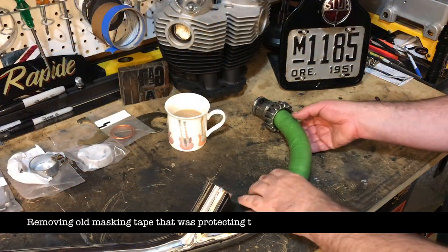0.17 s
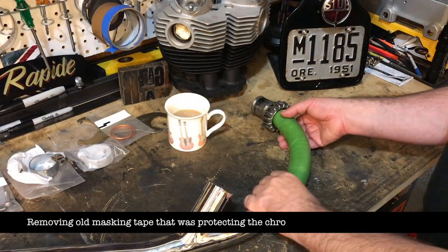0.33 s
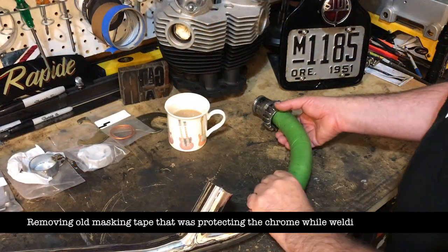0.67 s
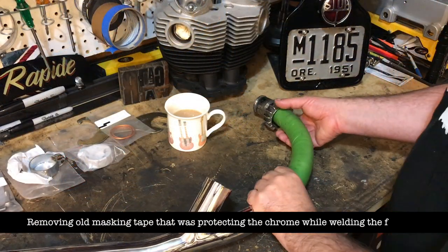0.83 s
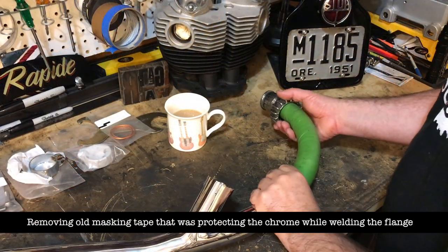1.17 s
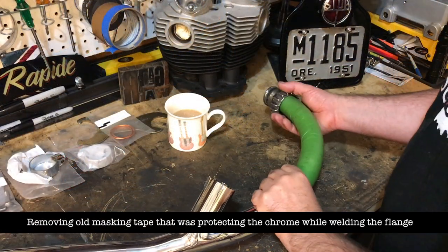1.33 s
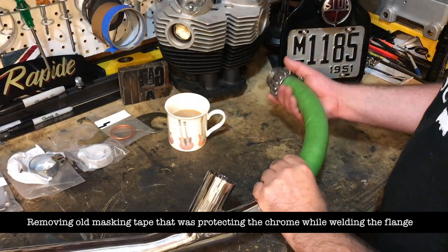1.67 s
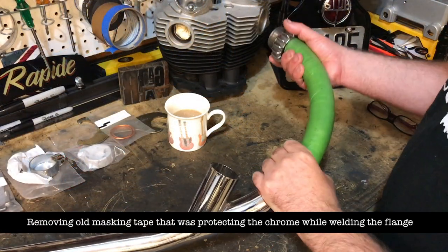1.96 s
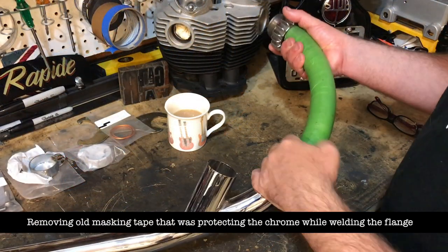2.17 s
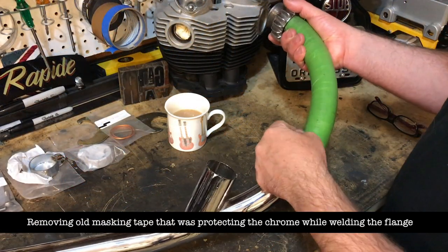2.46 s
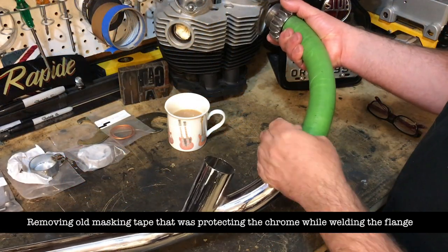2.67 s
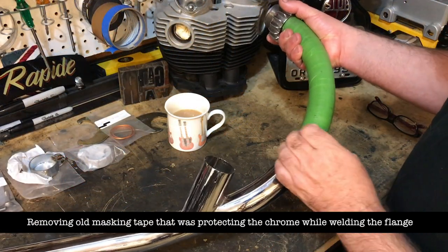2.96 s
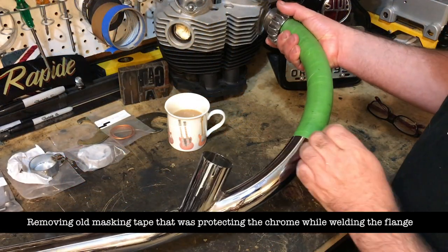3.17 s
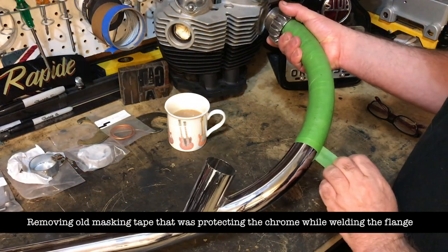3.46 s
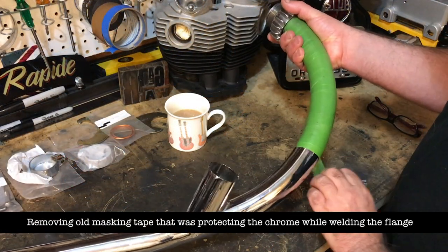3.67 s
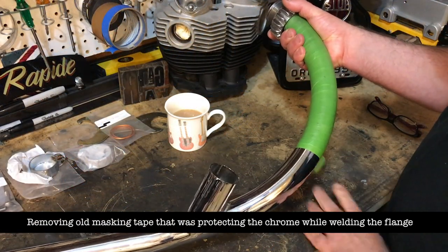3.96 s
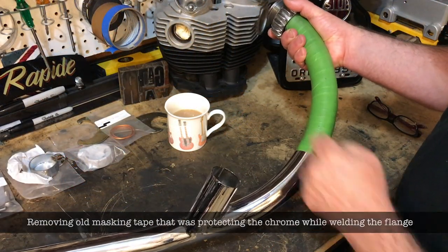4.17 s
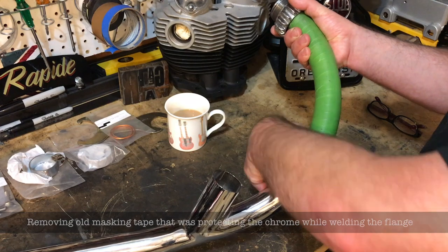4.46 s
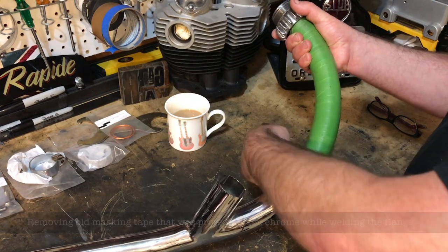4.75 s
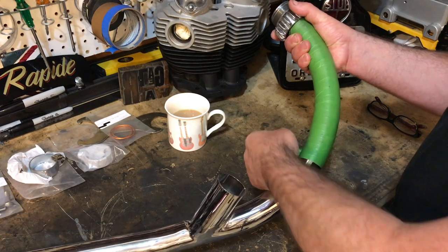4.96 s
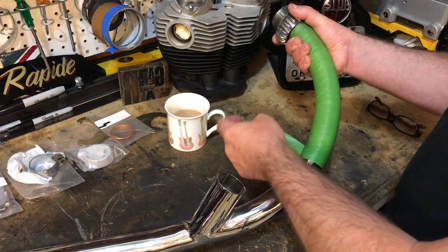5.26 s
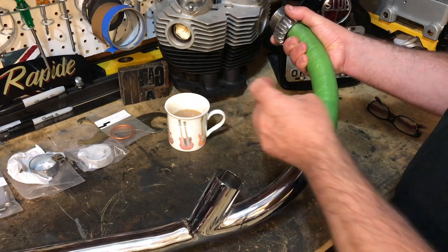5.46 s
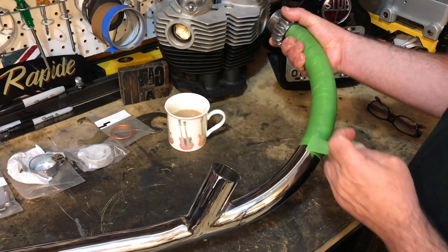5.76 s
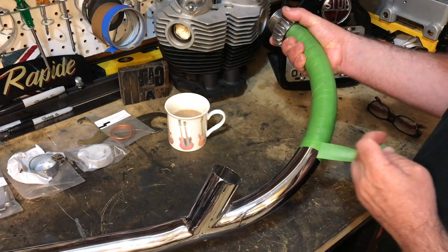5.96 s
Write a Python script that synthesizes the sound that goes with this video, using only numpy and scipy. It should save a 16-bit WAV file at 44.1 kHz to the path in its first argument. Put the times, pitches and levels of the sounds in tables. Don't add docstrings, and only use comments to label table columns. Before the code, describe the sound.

Very close in a quiet workshop, hands softly brush a taped steel pipe. A solid woody knock with small bounces comes early, followed by a short jangling scrape of a loose metal collar as the pipe is lifted. After fingertip rustles, masking tape peels in several crackling pulls, its tearing tone sinking as the strip lengthens, with sharp snaps. A faint low machine hum continues beneath.

```python
import sys
import numpy as np
from scipy import signal
from scipy.fft import rfft, irfft, next_fast_len
from scipy.io import wavfile
from scipy.ndimage import uniform_filter1d

SR = 44100
rng = np.random.default_rng(int(sys.argv[2]) if len(sys.argv) > 2 else 0)


def output_pcm(signal):
    pcm = np.clip(np.atleast_2d(signal).T, -1, 1) * 32767
    wavfile.write(sys.argv[1], SR, np.round(pcm).astype(np.int16))


def ratio(d):
    e = np.asarray(d, float) / 20
    return 10 ** e


N = 269892


def evened(x):
    return x / np.sqrt(np.mean(x ** 2) + 1e-30)


def smoothed(x, size, axis=-1):
    return uniform_filter1d(uniform_filter1d(x, size=size, axis=axis), size=size, axis=axis)


def read(points, hz):
    f, value = np.transpose(points)
    return np.interp(np.log(hz + 1), np.log(f + 1), value)


def curve(rows, column, rest_db=-120):
    t = np.arange(N) / SR
    rows = np.array(rows)
    return np.interp(t, rows[:, 0], rows[:, column], left=rest_db, right=rest_db)


def swells(rows, extra_db=0):
    t = np.arange(0, N, 64)[:, None] / SR
    peak, rise, fall, db = np.transpose(rows)[:4]
    away = np.where(t < peak, (peak - t) / rise, (t - peak) / fall)
    shape_db = -29 * away ** 1.325
    power = ratio(2 * (db + extra_db + shape_db)).sum(axis=1)
    return np.interp(np.arange(N) / SR, t[:, 0], np.sqrt(power))


def coloured(x, points):
    size = next_fast_len(len(x))
    gain = ratio(read(points, np.fft.rfftfreq(size, 1 / SR)))
    return evened(irfft(rfft(x, size) * gain, size)[:len(x)])


def resonate(x, hz, width):
    turn = np.exp(2j * np.pi * np.cumsum(hz * np.ones(len(x))) / SR)
    r = np.exp(-np.pi * width / SR)
    return 2 * (turn * signal.lfilter([1 - r], [1, -r], x / turn)).real


def ring(modes):
    t = np.arange(SR // 2) / SR
    out = sum(ratio(db - 60 * t / t60) * np.sin(2 * np.pi * hz * t) for hz, db, t60 in modes)
    return out / abs(out).max()


def blows(times, dbs):
    out = np.zeros(N)
    out[np.round(np.asarray(times) * SR).astype(int)] = ratio(dbs)
    return out


def crackle(per_s, spread_db, clump_db):
    size = ratio(spread_db * np.minimum(rng.exponential(1, N), 5)) * rng.standard_normal(N)
    clumps = evened(smoothed(rng.standard_normal(N), 150))
    return size * (rng.random(N) < per_s / SR) * ratio(clump_db * clumps)


def patchy(x, narrow_db, wide_db):
    z = signal.stft(x, nperseg=512, noverlap=384)[2]
    a, b = rng.standard_normal((2, z.shape[1], z.shape[0]))
    narrow = evened(uniform_filter1d(uniform_filter1d(a, size=22, axis=0), size=2, axis=1))
    wide = evened(uniform_filter1d(uniform_filter1d(b, size=9, axis=0), size=16, axis=1))
    gain = ratio(narrow_db * narrow + wide_db * wide).T
    return evened(signal.istft(z * gain, nperseg=512, noverlap=384)[1][:N])


def gliding_modes(rows, spread):
    out = np.zeros(N)
    shakes = rng.standard_normal((len(rows), SR // 2))
    for (start, length, db, first_hz, last_hz), shake in zip(rows, shakes):
        u = np.arange(0, min(length, .5) - 1 / SR, 1 / SR) / length
        hz = first_hz * (last_hz / first_hz) ** u
        width = spread * hz.mean()
        drum = evened(resonate(resonate(shake[:len(u)], hz, width), hz, 2 * width))
        flutter_db = 1.5 * evened(smoothed(shake[::-1], 500))[:len(u)]
        arch_db = -5 * (2 * u ** .8 - 1) ** 2
        sound = drum * ratio(db + arch_db + flutter_db) * signal.windows.tukey(len(u), .4)
        part = out[round(start * SR):][:len(u)]
        part += sound[:len(part)]
    return out


def background():
    # hz, level_db per Hz
    room = [(26, -22.5), (60, -2), (240, -13.5), (500, -21), (1300, -24), (5000, -30), (10000, -28.5),
            (14500, -35), (15750, -31.5), (15900, -87)]
    # time_s, level_db
    effort = [(0.0, -54.5), (1.07, -56), (1.14, -62.5), (1.62, -52.5), (1.91, -77), (1.98, -62),
              (2.34, -58.5), (2.59, -54), (3.82, -55.5), (3.9, -66), (4.23, -48), (4.38, -54), (5.49, -57),
              (5.56, -60), (5.67, -54), (6.12, -61)]
    # peak_s, rise_s, fall_s, level_db
    shifts = [
        (.7, 0.078, 0.32, -62),
        (1.15, 0.19, 0.09, -68),
        (1.42, .3, .15, -74),
        (1.8, 0.14, 0.67, -62.5),
        (2.48, 0.54, 0.09, -78),
        (3.2, 0.75, 0.61, -73.5),
        (4.43, 0.44, 0.35, -79),
        (4.79, 0.085, 0.099, -61.5),
        (5.7, 0.63, 0.4, -75.5),
    ]
    a, b, c, d, e = rng.standard_normal((5, N))
    hiss = coloured(a, room)
    high_pass = signal.butter(4, 160, "high", fs=SR, output="sos")
    hiss *= ratio(-75) / np.std(signal.sosfilt(high_pass, hiss))
    whine = ratio(-91) * evened(resonate(b, 720, 5))
    waver_hz = 30.1 + .6 * evened(resonate(resonate(c, 0, 3), 0, 3))
    hum = ratio(curve(effort, 1) + 1.5) * np.sin(2 * np.pi * np.cumsum(waver_hz) / SR)
    sway = ratio(-54.5) * coloured(d, [(3, -30), (6, -6), (8, 0), (11, -9), (18, -11), (24, -18), (40, -30),
                                     (60, -60), (150, -120)])
    rumble = coloured(e, [(45, -38), (65, 3.5), (100, 3.5), (140, -3.5), (220, -42), (500, -96)])
    shudder = (swells(shifts) + ratio(-83.5)) * rumble
    return hiss + whine + hum + sway + shudder


def peel():
    # peak_s, rise_s, fall_s, level_db, through_backing_db
    hands = [
        (.2, 0.28, 0.99, -77.5, -5),
        (.6, 0.26, 0.3, -93, -7),
        (1.14, 0.093, 0.093, -72.5, -11),
        (1.32, 0.054, 0.038, -76, -10),
        (1.916, 0.076, 0.15, -87, 7),
        (2.104, 0.041, 0.049, -76, -15),
        (2.299, 0.031, 0.04, -75, -16),
        (2.39, 0.059, 0.088, -76, -7.5),
        (2.475, .08, 0.039, -73.5, -7.5),
    ]
    # peak_s, rise_s, fall_s, level_db, through_backing_db
    tugs = [(2.58, 0.084, 0.65, -70.5, -23), (2.72, 0.047, 0.059, -54, -34),
            (2.856, 0.38, 0.14, -66.5, -11.5), (3.05, 0.24, 0.55, -60, -14.5),
            (3.28, 0.51, 0.093, -57.5, -8.5), (3.486, 0.32, 0.1, -52, -7), (3.61, 0.063, 0.19, -51, -13),
            (3.655, 0.15, 0.13, -50, -13.5), (3.70, 0.16, 0.069, -52.5, -3.5),
            (3.79, 0.068, 0.18, -73, 2.5), (3.86, 0.26, 0.069, -62, -16), (3.92, .01, 0.41, -73.5, -3),
            (4.135, 0.14, 0.078, -69.5, -8.5), (4.44, 0.023, 0.13, -65, -13.5),
            (4.62, 0.038, 0.14, -73.5, -5), (4.753, 0.03, 0.12, -55.5, -12), (4.89, 0.34, 0.17, -75, -6),
            (5.06, 0.15, 0.073, -61.5, -9), (5.13, 0.08, 0.29, -47.5, -10), (5.21, 0.18, 0.29, -50, -9.5),
            (5.414, 0.26, 0.14, -58.5, -8), (5.6, 1, 0.12, -64.5, -9.5), (5.698, 0.13, 0.037, -59, -16),
            (5.8, 0.98, 0.14, -65.5, -11), (6.038, 0.2, 0.13, -51, -10)]
    # hz, width_hz, level_db
    pipe = [(1104, 17, 24), (1318, 13, 14), (1715, 88, 11), (2000, 33, -14), (2340, 93, -20), (2920, 11, 1),
            (3070, 62, 10), (3590, 270, 9), (4100, 21, 3), (4700, 200, 10), (4990, 56, 17),
            (5060, 76, 14.5), (5960, 48, -10), (6340, 34, -15), (6100, 19, -32)]
    # hz, level_db per Hz
    snap_colour = [(5500, -22.5), (7500, -3), (9000, 3), (10800, 4.5), (13000, 0), (15500, -6),
                   (15900, -23), (16600, -68)]
    lower_colour = [(500, -11.5), (900, -11), (1300, -6), (2000, 0.5), (3000, 1), (4200, -1), (5800, -36)]
    mid_colour = [(2800, -37), (4200, 4), (6000, 8.5), (8000, -1.5), (10000, -47)]
    rows = tugs + hands
    micro = patchy(crackle(15000, spread_db=1.1, clump_db=.9), narrow_db=2.6, wide_db=1.4)
    wall = evened(sum(ratio(db) * resonate(micro, hz, width) / np.sqrt(width) for hz, width, db in pipe))
    through = micro + ratio(-15) * wall
    backing = ratio(-3.5) * coloured(through, lower_colour) + ratio(1) * coloured(through, mid_colour)
    through_db = np.transpose(rows)[-1]
    return swells(rows) * coloured(micro, snap_colour) + swells(rows, through_db) * backing


def knock():
    # time_s, level_db, deep_modes_db, low_panel_db
    hits = [
        (0.223, -59.5, 6, -17),
        (0.464, -21, -4, -18),
        (0.483, -39, 3, -16),
        (0.495, -38, 7, 10),
        (0.577, -43, -2.5, -21),
        (1.528, -51, -14, -25),
        (2.575, -70, -8, -21),
        (2.698, -70, -15, -22),
        (4.79, -58, -4, -4),
    ]
    # hz, level_db, t60_s
    bench = [(222, -3, 0.23), (282, -12, 0.11), (311.7, 8.5, 0.13), (377, -7.5, 0.14), (420, -6.5, 0.15),
             (459, 2, 0.12), (514, -3.5, 0.14), (598, -4.5, 0.18), (673, -12, 0.17), (760, -23, 0.11),
             (870, -21, .1), (985, -18, .12), (1090, -23, .1)]
    # hz, level_db, t60_s
    frame = [(77, 4, .3), (90, -6, .35), (115, -8, .2), (148, -2, .12)]
    # hz, level_db, t60_s
    pipe_wall = [(1707, 0, .16), (1947, 1, .09), (2195, -6, .1), (2860, -11, .2), (3575, -5, .1),
                 (4470, -11, .1), (5800, -10, .06), (6600, -8, .1), (7620, -14, .06)]
    # hz, level_db per Hz
    contact = [(300, 8.5), (700, 3), (1500, -13), (2500, -16), (4000, -18), (6700, -42), (10000, -24),
               (15000, -51)]
    t = np.arange(SR // 2) / SR
    s, db, deep_db, panel_db = np.transpose(hits)
    deep = -ring(frame) * (1 - np.exp(-t / 0.0082))
    panel = ring([(139.5, 0, .09)]) * (1 - np.exp(-t / 0.0058))
    top = ring(bench) * (1 - 0.51 * np.exp(-t / 0.0022))
    buzz = coloured(rng.standard_normal(len(t)), contact)
    buzz *= ratio(-26.5 - 60 * t / 0.2) + ratio(-28.5 - 60 * t / 0.8)
    crack = coloured(rng.standard_normal(len(t)), [(1200, -19), (2000, 7), (4200, -6), (7000, -4),
                                                   (12000, -11), (15500, -40)])
    crack *= ratio(-35.5 - 60 * t / 0.21)
    tube = ring(pipe_wall) * (1 - np.exp(-t / .0076)) * ratio(-18.5)
    parts = (db, tube + top + buzz + crack), (db + deep_db, deep), (db + panel_db, panel)
    return sum(signal.oaconvolve(blows(s, force_db), body)[:N] for force_db, body in parts)


def scuffs():
    # start_s, length_s, level_db, first_hz, last_hz
    rubs = [(.38, 0.1, -78.5, 4320, 4200), (2.95, .15, -79, 2460, 2420), (3.36, .1, -77, 1750, 1600),
            (4.735, 0.12, -72.5, 1550, 1260), (4.855, 0.04, -75, 1700, 1600), (5.0, .07, -75.5, 1850, 1800),
            (5.12, .13, -67.5, 3050, 2850), (5.34, .13, -77, 1636, 1450), (1.55, 0.066, -65, 1400, 990),
            (6.0, 0.11, -69, 1270, 1120), (3.0, .11, -74, 2050, 1600)]
    return gliding_modes(rubs, spread=.26)


def pings():
    # time_s, hz, level_db, t60_s
    short_rings = [(3.8969, 5600, -31, .0022), (3.8969, 8700, -28, .0022), (3.897, 13100, -37, .0035),
                   (3.897, 3900, -41, .003), (3.897, 1860, -52, .006), (4.0011, 9100, -47, .003),
                   (4.0011, 15300, -51, .003), (4.001, 1080, -54, .009), (4.0032, 2200, -59, .014),
                   (.4645, 3900, -56, .03), (1.3455, 14050, -58, .03), (1.367, 12700, -60, .09),
                   (1.368, 7110, -61, .07), (1.572, 1990, -54, .05), (1.555, 800, -60, .04),
                   (1.9015, 1150, -64, .015), (1.902, 5130, -64, .03), (1.9025, 7440, -66, .025),
                   (1.903, 3770, -68, .03), (1.903, 10800, -67, .03), (5.691, 830, -61, .014),
                   (4.7595, 1300, -58, .02), (2.577, 480, -76, .05), (2.7, 460, -72, .05),
                   (2.712, 320, -74, .05), (3.9072, 5500, -50, .003), (4.669, 1700, -68, .016),
                   (1.383, 600, -61, .05)]
    out, t = np.zeros(N), np.arange(4096) / SR
    for s, hz, db, t60 in short_rings:
        tone = ratio(db - 60 * t / t60) * (1 - np.exp(-t / .0002)) * 2 * np.sin(2 * np.pi * hz * t)
        out[round(s * SR):][:len(t)] += tone
    return out + ratio(-11) * np.roll(out, round(.0028 * SR))


def flange():
    # time_s, collar_db, tube_db, skid_s, answering_tube_hz
    touches = [(1.344, -42.5, -55.5, 0.0054, 4440), (1.366, -42, -55, 0.0032, 3970),
               (1.378, -41, -55, 0.004, 1800), (1.387, -48, -44.5, 0.01, 3080),
               (1.414, -45, -54, 0.0035, 3300), (1.44, -53, -79, 0.019, 3000),
               (1.462, -62, -58, 0.0074, 1800), (1.486, -56, -47, 0.0056, 2220),
               (1.519, -53.5, -52, 0.0015, 2000), (1.554, -53, -47.5, 0.014, 4600),
               (1.571, -66, -44, 0.0048, 1820), (1.588, -80, -75, 0.0032, 1310)]
    # time_s, collar_db, tube_db
    scrape = [(1.3, -85, -92), (1.34, -71, -76), (1.39, -62, -66), (1.45, -66, -63), (1.53, -71.5, -65),
              (1.57, -76, -59.5), (1.62, -80, -68), (1.78, -98, -81), (1.9, -86, -87)]
    # hz, level_db, t60_s
    collar = [(7110, -7, .06), (8590, -9, .07), (8861, -11, .06), (9340, 2, .05), (9600, -5, .03),
              (9932, -11, .03), (9000, -8, .06), (10720, -19, .04), (11760, -21, .04), (12700, -3, .06),
              (13380, -26, .04), (14050, -1, .035)]
    tube = [(603, -4, .07), (775, -4, .04), (1000, -8, .03), (1150, -6, .04), (1400, -9, .025),
            (1720, -5, .05), (1860, -1, .05), (1990, 0, .045), (2860, -6, .05), (3320, -2, .03),
            (4320, 2, .035), (4930, -3, .04), (5270, -11, .025), (6130, -12, .04)]
    out, t = np.zeros(N), np.arange(2048) / SR
    grit = patchy(crackle(9000, spread_db=1.5, clump_db=1.8), narrow_db=2, wide_db=2.5)
    for modes, column in ((np.array(collar), 1), (np.array(tube), 2)):
        hz = modes[:, 0]
        is_tube = column - 1
        body = ring(modes * [1, 1, .45] + np.outer(hz == 1990, [0, -7, 0]))
        crowd = coloured(rng.standard_normal(len(t)), [(.5 * hz[0], -50), (hz[0], -7), (np.median(hz), 0),
                                                       (hz[-1], -12), (1.06 * hz[-1], -45)])
        crowd *= ratio(-19 - 60 * t / .05)
        body[:len(t)] += crowd
        rub = grit * ratio(curve(scrape, column))
        out += signal.oaconvolve(rub, body / np.linalg.norm(body))[:N]

        places = rng.standard_normal((len(touches), len(modes)))
        noises = rng.standard_normal((len(touches), len(t)))
        for row, place, noise in zip(touches, places, noises):
            skid = noise * (1 - np.exp(-t / .0012)) * np.exp(-(t / max(row[3], .0003)) ** 2)
            grip_db = -12 * (hz == (1990 if row[0] < 1.47 else 1860))
            region_db = -is_tube * np.minimum(12 * np.log2(hz / row[4]) ** 2, 13)
            weight_db = grip_db + (.5 + column) * place + region_db
            detune_hz = is_tube * .007 * hz * place[::-1]
            body = ring(modes + np.outer(weight_db, [0, 1, 0]) + np.outer(detune_hz, [1, 0, 0]))
            body[:len(t)] += crowd
            sound = signal.oaconvolve(skid, body)
            out[round(row[0] * SR):][:len(sound)] += ratio(row[column]) * sound / abs(sound).max()
    return out


def whistles():
    # start_s, length_s, level_db, first_hz, last_hz
    tones = [
        (1.57, .14, -87, 8600, 8590),
        (1.71, .19, -86, 8590, 8590),
        (1.79, .11, -91, 6300, 6900),
        (1.315, .04, -84, 3320, 3320),
        (2.57, .04, -86, 4180, 4180),
        (2.56, .12, -86, 5120, 5100),
        (2.81, .08, -86, 4050, 4030),
        (1.65, .06, -86, 2870, 2860),
    ]
    return gliding_modes(tones, spread=.012)


def rasps():
    # start_s, length_s, level_db, first_hz, last_hz
    held = [
        (1.343, 0.18, -74, 4380, 4280),
        (1.34, .14, -67, 3350, 3250),
        (1.38, 0.072, -67, 1860, 1900),
        (1.345, .11, -74, 5280, 5150),
        (1.345, 0.059, -70, 604, 620),
        (1.345, 0.048, -74, 1150, 1140),
        (1.385, 0.095, -72, 2860, 2900),
        (1.55, 0.053, -74, 5000, 4860),
        (1.55, 0.046, -73, 3300, 3330),
    ]
    return gliding_modes(held, spread=.038)


def snaps():
    # time_s, peak_db, centre_hz, under_2500_hz_db, crack_over_fizz_db
    cracks = [
        (2.6195, -56, 11000, -24, 3),
        (3.3565, -46, 5000, -14, 12),
        (4.0012, -49, 10000, -10, -4),
        (4.381, -56, 5500, -14, 10),
        (4.591, -58, 4800, -14, 4),
        (5.69, -45, 10000, -10, 12),
        (3.5965, -33, 10500, -28, 16),
        (3.897, -33, 8000, -20, -3),
    ]
    # time_s, peak_db, centre_hz, under_2500_hz_db, crack_over_fizz_db
    rustles = [
        (1.9008, -52, 4000, 1, -17),
        (2.0911, -71, 11600, -23, 1),
        (2.5564, -57, 12000, -27, -9),
        (4.436, -66, 9470, -24, -4),
        (4.616, -57.5, 10900, -9, -11),
        (4.668, -56, 9120, -9, -4),
        (4.742, -54.5, 7250, 1, 2),
        (4.8626, -47, 9000, -22, -10),
        (4.89, -46, 10720, -28, -12),
    ]
    rows = cracks + rustles
    rise_t60 = [(.0008, .045)] * len(cracks) + [(.004, .059)] * len(rustles)
    out, t = np.zeros(N + 4096), np.arange(4096) / SR
    noises = rng.standard_normal((len(rows), 2, len(t)))
    for (s, db, hz, low_db, crack_db), (rise, t60), noise in zip(rows, rise_t60, noises):
        bright = coloured(noise[0], [(1500, -30), (.45 * hz, -9), (hz, 0), (13500, -6), (15500, -16)])
        crack = bright * np.exp(-((t - .0007) / .0005) ** 2)
        fizz = bright * (1 - np.exp(-t / rise)) * ratio(-60 * t / t60) / 3
        dull = coloured(noise[1], [(300, -3), (700, -4.5), (1500, 1.5), (2300, -3), (3200, -38)])
        dull *= ratio(-60 * t / 0.065) * (1 - np.exp(-2 * t / rise)) * .5
        sound = ratio(crack_db) * crack / abs(crack).max() + fizz
        out[round(s * SR):][:len(t)] += ratio(db) * (sound / abs(sound).max() + ratio(low_db) * dull)
    return out[:N]


def bore(x):
    # hz, width_hz, level_db
    air = [
        (312, 32, -3),
        (414, 37, 7),
        (620, 150, -7.5),
        (775, 54, 5.5),
        (1120, 46, -1),
        (1347, 50, 6),
        (1710, 94, 1),
        (2170, 47, 5.5),
        (2480, 67, -4),
        (2760, 42, -5),
    ]
    inside = sum((-1) ** k * ratio(db) * resonate(x, hz, width) for k, (hz, width, db) in enumerate(air))
    return ratio(-3.5) * x + ratio(1) * inside


def freed_strip():
    # start_s, length_s, level_db, first_hz, last_hz
    lengthwise = [(2.83, 0.22, -72.5, 2960, 2200), (2.96, 0.17, -63.5, 2270, 1390),
                  (3.09, 0.28, -69.5, 1290, 960), (3.415, 0.039, -64, 796, 775),
                  (3.455, 0.078, -63.5, 890, 715), (3.585, 0.085, -60.5, 830, 670),
                  (3.66, 0.078, -66.5, 710, 517), (3.65, 0.077, -66, 1060, 1010),
                  (5.09, 0.19, -59, 1100, 395), (5.27, 0.33, -76.5, 470, 393),
                  (5.68, 0.27, -82.5, 430, 382), (5.92, 0.17, -70, 447, 284)]
    # start_s, length_s, level_db, first_hz, last_hz
    crosswise = [
        (2.1, 0.087, -88, 3800, 4100),
        (4.43, 0.046, -80, 8200, 8700),
        (4.432, 0.04, -80, 7600, 8900),
        (4.745, 0.034, -58, 7760, 6500),
        (3.255, 0.062, -69, 2500, 2360),
        (5.09, 0.077, -66.5, 1530, 1440),
        (5.18, 0.11, -66.5, 2030, 2000),
        (5.34, 0.14, -71.5, 2720, 2430),
        (6.8, 0.06, -67, 1330, 1160),
        (5.95, 0.067, -69, 1700, 1800),
    ]
    return bore(gliding_modes(lengthwise, spread=.32)) + gliding_modes(crosswise, spread=.07)


def walls(x):
    # hz, t60_s
    decay = [
        (100, 0.26),
        (500, 0.49),
        (2000, 0.3),
        (6000, 0.32),
        (14000, 0.16),
    ]
    taps = np.zeros(SR // 2)
    at = np.arange(120, len(taps) - 20, 20)
    taps[at + rng.integers(0, 20, len(at))] = rng.choice([-1., 1.], len(at))
    hz, t, z = signal.stft(taps, SR, nperseg=256)
    tail = signal.istft(z * ratio(-60 * t / read(decay, hz)[:, None]), SR, nperseg=256)[1]
    return signal.oaconvolve(x, tail / np.linalg.norm(tail))[:N]


def scene():
    tape = peel() + freed_strip() + whistles() + snaps()
    metal = flange()
    blow = knock()
    wet = walls(ratio(-6.5) * tape + ratio(-9) * metal + ratio(-10) * blow)
    return (background() + tape + blow + scuffs() + pings() + metal + rasps() + wet)[None]


def top_cut(x):
    return signal.sosfilt(signal.butter(12, 16530, fs=SR, output="sos"), x)


def record(dry):
    low_pass = signal.firwin(511, 16550, window=("kaiser", 9), fs=SR)
    limited = signal.oaconvolve(dry, low_pass[None], "same")
    return top_cut(limited)


dry = scene()
out = record(dry)
output_pcm(out)
```